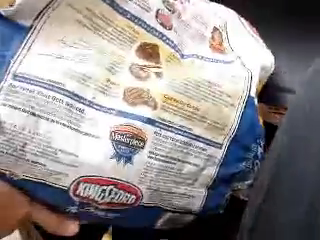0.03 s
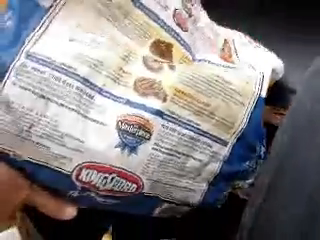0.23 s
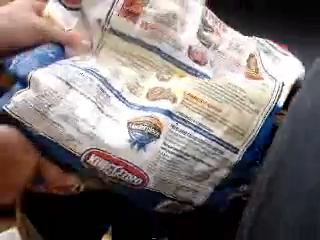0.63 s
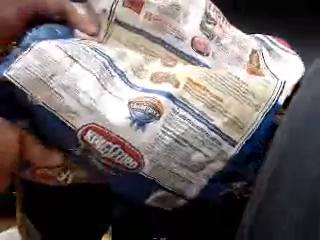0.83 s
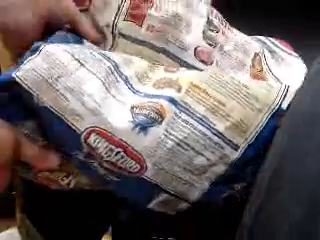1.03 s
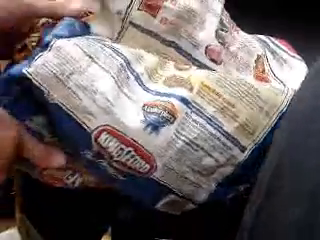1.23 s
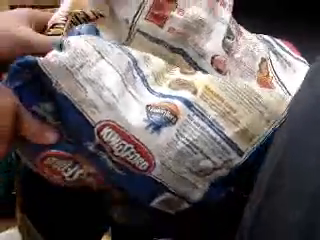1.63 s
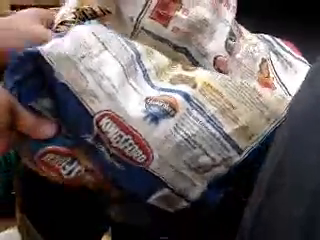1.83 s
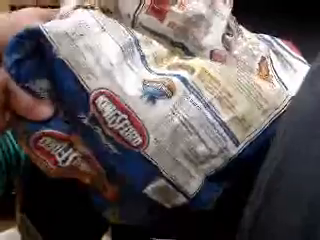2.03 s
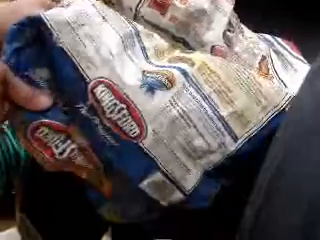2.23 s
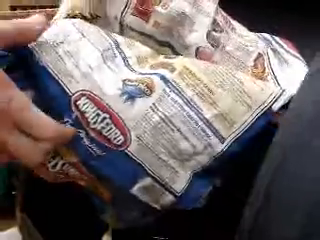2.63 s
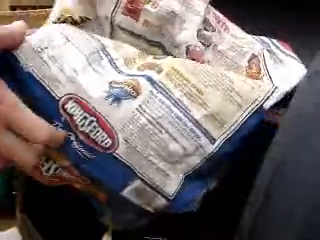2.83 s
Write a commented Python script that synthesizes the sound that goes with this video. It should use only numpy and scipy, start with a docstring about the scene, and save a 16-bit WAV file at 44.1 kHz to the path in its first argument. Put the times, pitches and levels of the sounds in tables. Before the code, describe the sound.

A paper sack crinkles in bursts while charcoal lumps shift and clack inside it.

```python
"""Crunching, crackling paper, close up: a stiff sack of charcoal is tipped and shaken. The paper slides, snaps
and buckles in bursts of tiny creases. The sack's wall flexes and the air inside rings, while briquettes shift,
thud and clack over a faint low rumble. A limiter briefly turns down each loud crunch."""
import sys
import numpy as np
from scipy import signal
from scipy.fft import rfft, irfft
from scipy.io import wavfile
from scipy.ndimage import uniform_filter1d

SR = 44100
rng = np.random.default_rng(int(sys.argv[2]) if len(sys.argv) > 2 else 0)


def bounce(signal):
    """Save signal as a 16-bit WAV file at the path given by the first command-line argument."""
    frames = np.transpose(np.atleast_2d(signal))
    limited = np.clip(frames, -1, 1)
    pcm = np.round(limited * 32767).astype(np.int16)
    wavfile.write(sys.argv[1], SR, pcm)


N = 132300
T = np.arange(N) / SR


def from_db(db):
    """Turn decibels into a number to multiply by."""
    return 10 ** (np.asarray(db) / 20)


def unit_power(x):
    """Scale a sound to an average power of 1."""
    return x / np.sqrt(np.mean(x ** 2) + 1e-20)


def level_curve(rows):
    """A volume that glides through (t/s, level/dB) points."""
    return from_db(np.interp(T, *np.transpose(rows)))


def envelope(start, rise, hold, decay):
    """A volume that climbs steadily, holds, then dies away; times in seconds."""
    age = T - start
    attack = np.clip(age / max(rise, 1e-4), 0, 1)
    return attack * np.exp(-np.maximum(age - rise - hold, 0) / max(decay, 1e-4))


def colour(x, points):
    """Shape the bass and treble along (f/Hz, level/dB) points."""
    size = 2 * N
    hz, db = np.transpose(points)
    log_hz = np.log(np.arange(N + 1) * SR / size + 1)
    cepstrum = irfft(np.log(from_db(np.interp(log_hz, np.log(hz), db))))
    cepstrum[1:N] *= 2   # minimum phase: the filter rings after a click, never before
    cepstrum[N + 1:] = 0
    return irfft(rfft(x, size) * np.exp(rfft(cepstrum)))[:N]


def resonate(x, hz, width_hz):
    """Ring at one pitch; a narrower width rings longer."""
    r = np.exp(-np.pi * width_hz / SR)
    feedback = [1, -2 * r * np.cos(2 * np.pi * hz / SR), r * r]
    return signal.lfilter(np.array([1, 0, -1]) * (1 - r * r) / 2, feedback, x + 1e-18)


def steady(x, window_s):
    """Even out slow changes in loudness and keep the fine crackle."""
    size = max(int(window_s * SR), 2)
    power = uniform_filter1d(uniform_filter1d(x * x, size), size)
    return x / np.sqrt(np.abs(power) + 1e-12)


def clicks(per_s, spread_db):
    """Random clicks; with more spread, a few stand out above the rest."""
    sizes = from_db(spread_db * np.minimum(rng.exponential(1, N), 4))
    return (rng.random(N) < per_s / SR) * sizes * rng.choice([-1, 1], N)


def grains(per_s, spread_db, width_share):
    """Sharp clicks that each ring briefly at a randomly picked pitch."""
    pitches = np.geomspace(SR / 100, SR / 4, 28)
    ticks = clicks(per_s, spread_db)
    picked = rng.integers(0, len(pitches), N)
    rings = sum(resonate(ticks * (picked == k), hz, hz * width_share) for k, hz in enumerate(pitches))
    return unit_power(rings) + unit_power(ticks)


# how loud the rumble is: t/s, level/dB
RUMBLE_LOUDNESS = [(0, -49), (.4, -44.5), (.64, -38), (.77, -62), (.88, -70), (.97, -52), (1.35, -50),
                   (1.43, -66), (1.52, -56), (1.97, -42), (2.05, -66), (2.16, -55), (2.4, -53.5),
                   (2.75, -62), (3, -57)]
# its tone, from bass to treble: f/Hz, level/dB
RUMBLE_TONE = [(15, 2), (45, 0), (110, 6), (300, -3), (2000, -20.5)]
def low_rumble():
    """Faint, deep noise that swells and fades."""
    return level_curve(RUMBLE_LOUDNESS) * unit_power(colour(rng.standard_normal(N), RUMBLE_TONE))


# faint rings that colour the crunch: f/Hz, width/Hz, level/dB
FAINT_RINGS = [(428, 33, 0.5), (1434, 7.4, -7.5), (1770, 41, -14), (3754, 170, -8), (4150, 16, -11),
               (4980, 68, -9), (5300, 22, -16)]
def surroundings(x, echo_db=-15, fade_60db_s=0.27, delay_s=0.0039):
    """Add faint rings and a short scatter of echoes from nearby surfaces."""
    x = x + sum(from_db(db) * resonate(x, hz, width) for hz, width, db in FAINT_RINGS)
    tail = rng.standard_normal(N) * from_db(-60 * T / fade_60db_s) * (T > delay_s)
    return x + from_db(echo_db) * signal.fftconvolve(x, tail / np.linalg.norm(tail))[:N]


# how loud the shifting charcoal is: t/s, level/dB
SHIFT_LOUDNESS = [(0, -34), (.14, -36), (.22, -32), (.43, -35), (.64, -26), (.8, -33), (1.01, -37),
                  (1.2, -33), (1.42, -30), (1.52, -34.5), (1.83, -32.5), (2.0, -30.5), (2.26, -41),
                  (2.58, -41), (2.86, -46.5), (3, -39.5)]
# its tone: f/Hz, level/dB
SHIFT_TONE = [(40, -67), (110, -14.5), (190, 9.5), (310, 7), (440, 4.5), (650, -2.5), (1050, -1),
              (2000, -4.5), (3500, -8), (9000, -25)]
def shifting_charcoal():
    """Lumps jostle in many small, dull knocks."""
    knocks = colour(grains(per_s=1000, spread_db=0.5, width_share=0.14), SHIFT_TONE)
    return level_curve(SHIFT_LOUDNESS) * steady(knocks, window_s=0.39)


# how loud the sliding paper is: t/s, level/dB
SLIDE_LOUDNESS = [(0, -36), (.15, -36), (.25, -34), (.37, -30), (.44, -36.5), (.6, -27.5), (.85, -27),
                  (1.03, -32), (1.14, -30.5), (1.24, -37), (1.34, -27), (1.52, -35), (1.7, -30.5),
                  (1.92, -26), (2.2, -27.5), (2.38, -30.5), (2.66, -35), (2.89, -41.5), (3, -36.5)]
# its tone: f/Hz, level/dB
SLIDE_TONE = [(60, -58.5), (120, -1), (250, -10.5), (700, -6), (1800, 1.5), (3600, -1.5), (5500, -5),
              (8000, -8.5), (9800, -11.5), (16000, 0)]
def sliding_paper():
    """Paper crackles finely as it drags over the charcoal."""
    crackle = colour(grains(per_s=8000, spread_db=0.5, width_share=0.18), SLIDE_TONE)
    return level_curve(SLIDE_LOUDNESS) * steady(crackle, window_s=0.17)


# soft bumps: t/s, level/dB, f/Hz
LOAD_BUMPS = [(0.186, -24, 206), (0.278, -26, 219), (0.61, -28, 108), (0.614, -20, 184),
              (0.631, -19.5, 263), (0.653, -20, 193), (.664, -31, 50), (1.269, -23, 246),
              (2.6862, -23.5, 330), (2.6862, -23.5, 740)]
def thudding_load():
    """The load bumps the sack's wall, and each thud dies within a few vibrations; a deep bump also sits under
    the loud crunch near 0.66 s."""
    return sum(from_db(db) * envelope(t, .5 / hz, .5 / hz, 1 / hz) * np.sin(2 * np.pi * hz * (T - t))
               for t, db, hz in LOAD_BUMPS)


# pitches at which the hollow sack rings: f/Hz, width/Hz, level/dB
SACK_RINGS = [(109, 18, -15.5), (168.5, 21, -3), (267, 88, -6), (357, 29, 1.5), (489, 270, -35)]
# bends of the wall, each with its main pitch: t/s, level/dB, length/s, f/Hz
WALL_BENDS = [(0.025, -32, 0.04, 428), (0.199, -24, 0.028, 395), (0.246, -31, 0.016, 472),
              (0.284, -30.5, 0.044, 406), (0.469, -26.5, 0.066, 422), (0.575, -24, 0.015, 510),
              (0.64, -25, 0.032, 328), (0.748, -30, 0.048, 446), (1.149, -27, 0.003, 515),
              (1.207, -32, 0.017, 368), (1.254, -31, 0.022, 350), (1.335, -36, 0.032, 330),
              (2.047, -39, .04, 440), (2.729, -37, 0.033, 417)]
def flexing_wall(rise_s=0.0025, decay_s=0.005, ring_db=9):
    """Runs of tiny slips drum on the hollow sack; the main pitch differs with each bend."""
    slips = clicks(per_s=250, spread_db=6.5)
    hollow = sum((-1) ** k * from_db(db) * resonate(slips, hz, width)
                 for k, (hz, width, db) in enumerate(SACK_RINGS))
    out = 0
    for t, db, length, hz in WALL_BENDS:
        drumming = hollow + from_db(ring_db) * resonate(slips, hz, width_hz=43)
        out += from_db(db) * envelope(t, rise_s, length, decay_s) * steady(drumming, window_s=0.013)
    return out


# notes of the squeezed air: t/s, level/dB, rise/s, decay/s, f/Hz
AIR_NOTES = [(.634, -13, 0.026, 0.008, 440), (1.403, -22.5, 0.013, 0.029, 418.6),
             (1.939, -24, 0.011, 0.043, 445.5), (2.388, -30, 0.015, 0.034, 431)]
def ringing_hollow(waver_share=0.013):
    """A hard bend sets the air in the sack ringing on one clear, slightly wavering note."""
    waver = unit_power(uniform_filter1d(uniform_filter1d(rng.standard_normal(N), size=600), size=600))
    clock = np.cumsum(1 + waver_share * waver) / SR
    return sum(from_db(db) * envelope(t, rise, 0, decay) * np.sin(2 * np.pi * hz * clock)
               for t, db, rise, decay, hz in AIR_NOTES)


# the tones in one lump's ring: multiple of its pitch, level/dB, time to fade by 60 dB/s
LUMP_TONES = [(.62, -23, 0.0078), (1, 2, 0.024), (1.37, -14, 0.01), (1.9, 0, 0.0076), (2.8, -13, 0.0095)]
# lumps hitting each other: t/s, relative level/dB, f/Hz
LUMP_HITS = [(0.2771, -16.5, 2670), (.398, -19, 2070), (0.5853, -19, 1630), (.654, -7.5, 2220),
             (0.716, -15, 1540), (0.772, -10.5, 1960), (0.939, -18, 1670), (1.0445, -15, 1910),
             (1.0827, -15, 1780), (1.124, -21, 1400), (1.18, -10.5, 1390), (1.184, -15.5, 1110),
             (1.582, -17.5, 1030), (1.634, -17.5, 990), (1.711, -18, 1330), (1.728, -18.5, 3320),
             (1.755, -15.5, 2080), (2.315, -16.5, 1260), (2.6868, -7.5, 900)]
def clacking_briquettes(crack_db=-16, crack_decay_s=0.0032):
    """Two lumps touch twice, harder the second time, with a gritty crack and a very brief ring."""
    out, age = np.zeros(N + SR), T[:SR // 10]
    for t, db, hz in LUMP_HITS:
        gap_s = rng.uniform(0.000753, 0.002327)
        for delay, touch_db in ((0, -11), (gap_s, -6.5)):
            ring = 0
            for multiple, tone_db, fade_s in LUMP_TONES:
                fade = from_db(tone_db + rng.normal(0, 0.65) - 60 * age / fade_s)
                sign = rng.choice([-1, 1])
                tone_hz = hz * multiple * (1 + rng.normal(0, 0.058))
                ring += fade * sign * np.sin(2 * np.pi * tone_hz * age)
            grit = unit_power(resonate(rng.standard_normal(len(age)), 2 * hz, 2 * hz))
            crack = from_db(crack_db) * grit * np.exp(-age / crack_decay_s)
            start = int((t + delay) * SR)
            out[start:start + len(age)] += from_db(db + touch_db) * (ring + crack)
    bass_cut = signal.butter(2, 350, "high", fs=SR, output="sos")
    return signal.sosfilt(bass_cut, out[:N] + 1e-18)


# single sharp snaps: t/s, level/dB, f/Hz
PAPER_SNAPS = [(.1885, -17.5, 2980), (.5838, -9.5, 2620), (.6715, -4, 2400), (.979, -17, 3000),
               (1.045, -15.5, 3000), (1.0829, -8, 2280), (1.1797, -18.5, 2600), (1.753, -25.5, 2600),
               (2.6872, -10, 2980)]
def snapping_paper(decay_s=0.0013, width_share=0.8):
    """A crease gives way all at once, in a snap just milliseconds long."""
    out, age = np.zeros(N + SR), T[:SR // 50]
    for t, db, hz in PAPER_SNAPS:
        burst = rng.standard_normal(len(age)) * np.exp(-age / decay_s)
        snap = resonate(burst, hz, hz * width_share)
        start = int(t * SR)
        out[start:start + len(age)] += from_db(db) * snap / np.abs(snap).max()
    return out[:N]


# the tone of creasing paper: f/Hz, level/dB
CREASE_TONE = [(60, -38), (120, -17.5), (220, -22), (400, -7.5), (700, -5.5), (1500, 0.5), (3700, -0.5),
               (5500, -1), (8000, -7.5), (9800, -11.5), (16000, -8.5)]
# folds giving way: t/s, level/dB, rise/s, hold/s, decay/s, f/Hz, brightness/(dB per octave)
PAPER_FOLDS = [(0.27, -35, 0.002, 0.0028, 0.0018, 2800, 1), (0.46, -29.5, .008, 0.032, 0.068, 3050, 0.5),
               (0.577, -34, 0.00087, 0.0015, 0.0028, 3000, -13),
               (0.612, -18.5, 0.031, 0.02, 0.0045, 1910, -5),
               (0.6733, -5.5, 0.00093, 0.0146, 0.011, 4940, 4.5),
               (0.69, -23, 0.0038, 0.044, 0.017, 1580, -1.5),
               (0.742, -19, 0.0065, 0.022, 0.0087, 2780, 0.5), (0.783, -17.5, 0.0034, 0.01, 0.036, 4850, 3),
               (0.883, -19.5, 0.0013, 0.0075, 0.01, 4740, 2), (.959, -32.5, .003, 0.009, 0.053, 3500, 4),
               (1.076, -26.5, 0.0015, 0.005, 0.004, 2200, -3), (1.092, -22, .006, 0.012, 0.017, 3380, -0.5),
               (1.344, -18, 0.0054, 0.02, 0.017, 2330, -1.5), (1.38, -13.5, 0.0033, 0.015, 0.027, 4830, 1),
               (1.936, -16, 0.0059, 0.0032, 0.028, 3580, 0.5), (1.985, -22, 0.0047, 0.0074, 0.015, 3580, 2),
               (2.025, -19.5, 0.013, 0.0091, 0.0075, 3770, 1),
               (2.05, -16.5, 0.0033, 0.016, 0.035, 4180, 2.5), (2.134, -19, .009, 0.006, 0.022, 2210, -0.5),
               (2.157, -19.5, 0.0016, 0.015, 0.03, 4000, 2), (2.263, -25.5, 0.0045, 0.0041, 0.012, 4700, 8),
               (2.293, -26.5, 0.0028, 0.015, 0.012, 3600, -0.5),
               (2.386, -18.5, 0.0041, 0.008, 0.022, 3970, 2),
               (2.682, -15, 0.0098, 0.016, 0.0096, 3630, 2.5),
               (2.718, -28.5, 0.0046, 0.028, 0.029, 3530, 0), (2.814, -36, 0.0045, 0.0075, 0.031, 4440, 3)]
def buckling_paper(boost_db=2.5, boost_octaves=0.41):
    """Each buckle is a rush of tiny creases, coloured by the size and crispness of its fold."""
    creases = colour(grains(per_s=8000, spread_db=0, width_share=0.078), CREASE_TONE)
    spectrum = rfft(steady(creases, window_s=0.007))
    octaves = np.log2(np.clip(np.arange(N // 2 + 1) * SR / N, 400, 8000))
    out = 0
    for t, db, rise, hold, decay, hz, brightness in PAPER_FOLDS:
        near_pitch = np.exp(-((octaves - np.log2(hz)) / boost_octaves) ** 2)
        fold_tone = from_db(brightness * octaves + boost_db * near_pitch)
        crunch = unit_power(irfft(spectrum * fold_tone, N))
        out += from_db(db) * envelope(t, rise, hold, decay) * crunch
    return out


def scene():
    """Mix the paper, the charcoal and the sack's low sounds into one channel."""
    paper = buckling_paper() + snapping_paper() + sliding_paper()
    crunch = paper + shifting_charcoal() + clacking_briquettes()
    rumble = low_rumble()
    return (surroundings(crunch) + flexing_wall() + ringing_hollow() + thudding_load() + rumble)[None]


def low_pass(x, hz):
    """Steeply cut everything above this frequency."""
    return signal.sosfilt(signal.ellip(12, .2, 80, hz, fs=SR, output="sos"), x)


def record(dry, limit_db=-13.5, window_s=0.0019, release_db_per_s=341):
    """A fast limiter turns down loud moments; the top treble is softened and the very top cut off."""
    memory = np.exp(-1 / (window_s * SR))
    power = signal.lfilter([1 - memory], [1, -memory], dry[0] ** 2)
    over_db = np.maximum(10 * np.log10(power + 1e-12) - limit_db, 0)
    recovery_db = release_db_per_s * T
    duck_db = np.maximum.accumulate(over_db + recovery_db) - recovery_db   # dip at once, recover steadily
    limited = dry * from_db(-duck_db)
    softened = low_pass(limited, hz=9974) + from_db(-26) * limited
    return low_pass(softened, hz=15700)


dry = scene()
out = record(dry)
bounce(out)
```